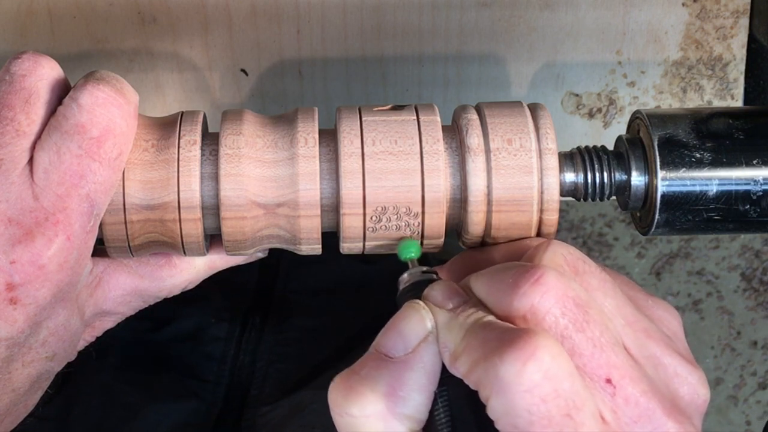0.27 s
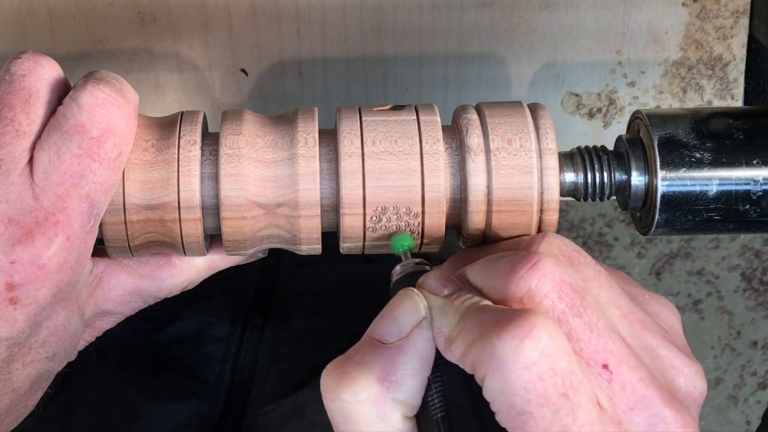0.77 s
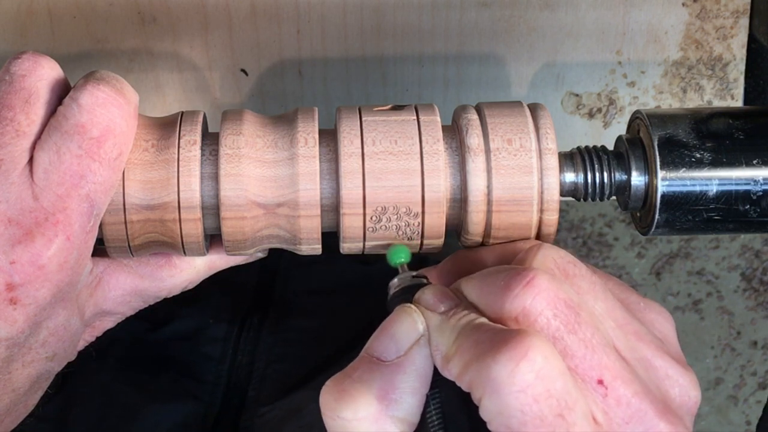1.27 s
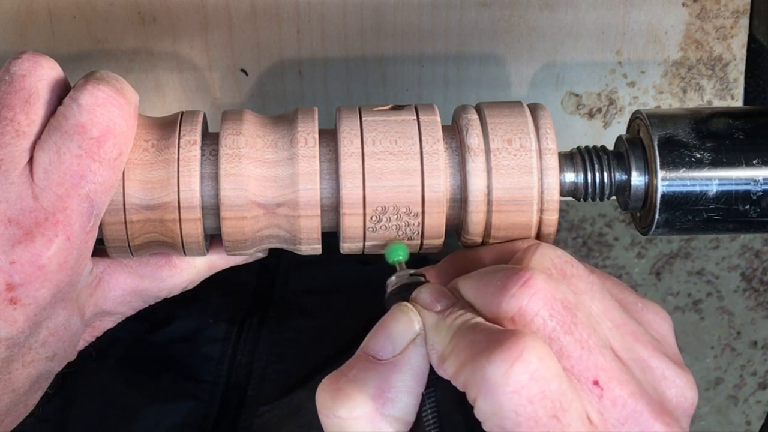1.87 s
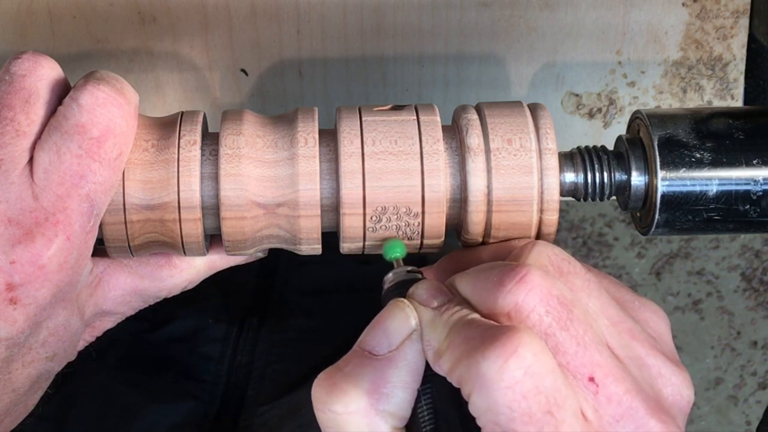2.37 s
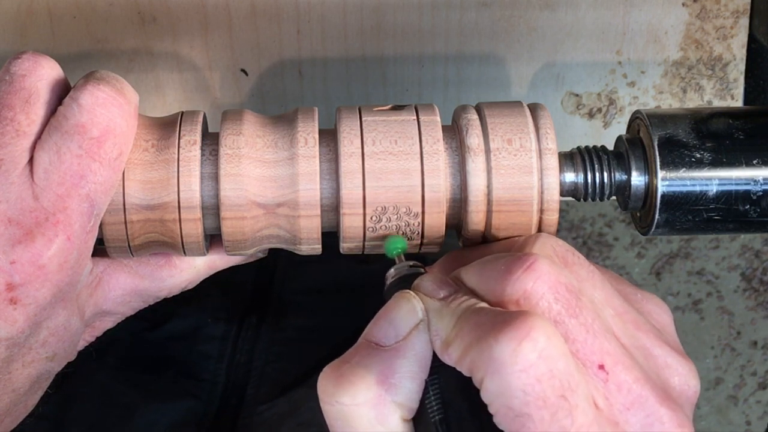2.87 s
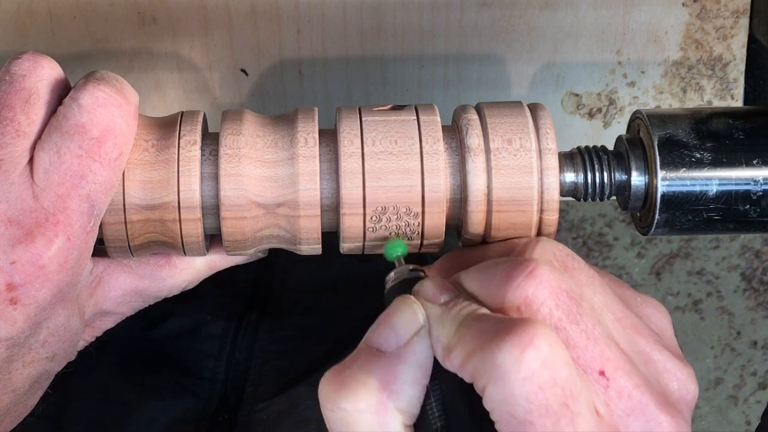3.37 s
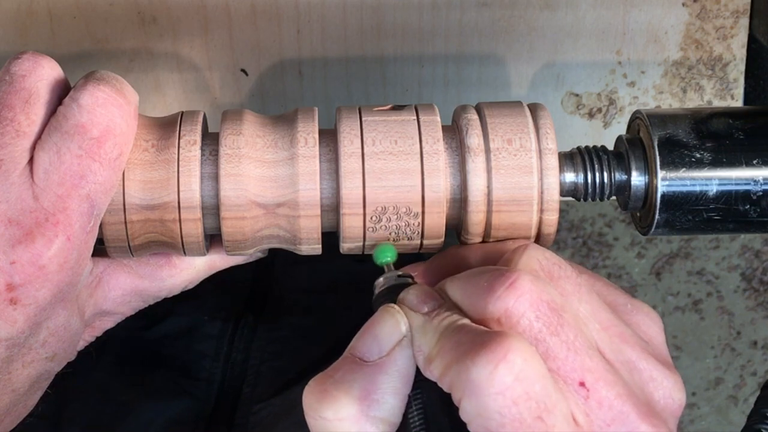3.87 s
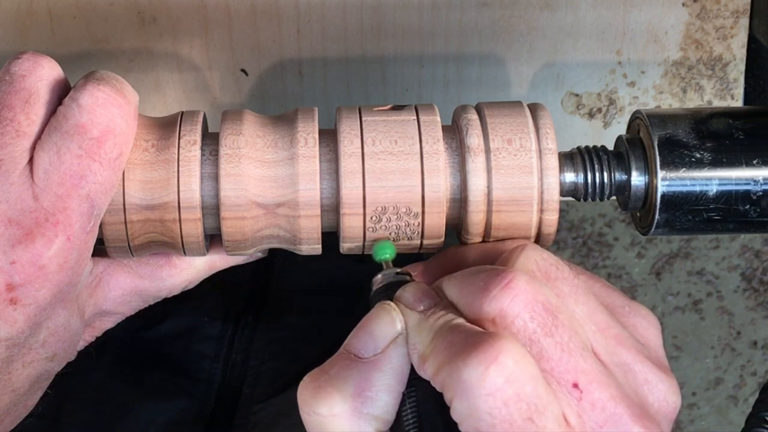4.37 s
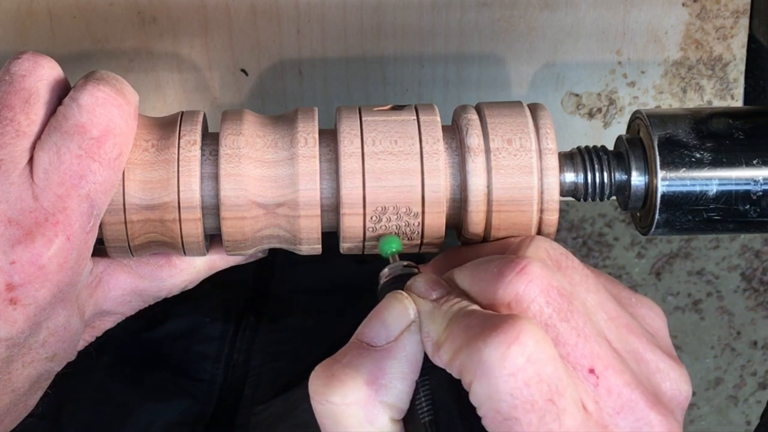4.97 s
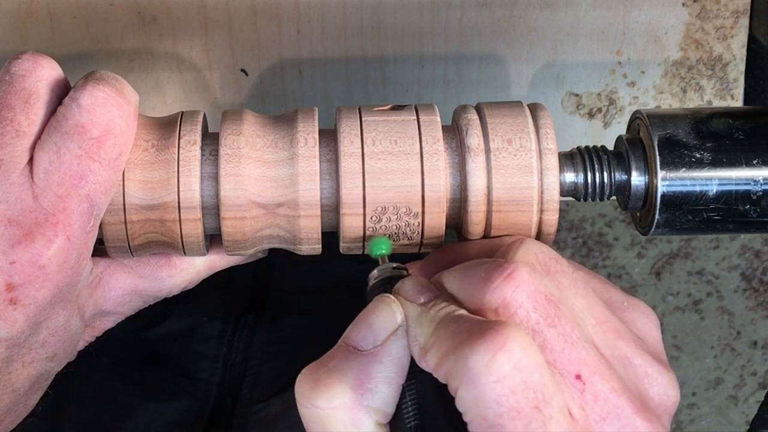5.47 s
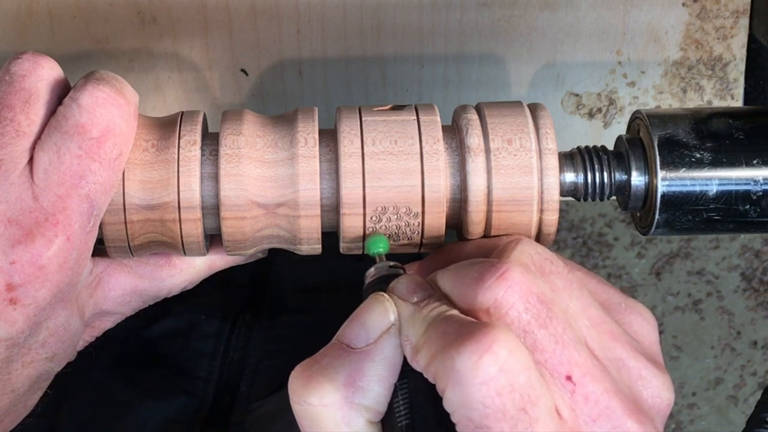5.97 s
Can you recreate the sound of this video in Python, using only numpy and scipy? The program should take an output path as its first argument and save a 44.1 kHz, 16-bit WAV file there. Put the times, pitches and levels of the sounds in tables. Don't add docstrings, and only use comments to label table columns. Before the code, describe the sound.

A small high-speed rotary carving tool whines close up, its pitch sagging and recovering as the burr is pressed repeatedly into wood.

```python
import sys
import numpy as np
from scipy import signal
from scipy.fft import rfft, irfft
from scipy.io import wavfile
from scipy.ndimage import uniform_filter1d, map_coordinates

SR = 44100
rng = np.random.default_rng(int(sys.argv[2]) if len(sys.argv) > 2 else 0)


def wav_out(sig):
    wavfile.write(sys.argv[1], SR, np.round(np.clip(np.atleast_2d(sig).T, -1, 1) * 32767).astype(np.int16))


def ratio_of_db(decibels):
    return 10 ** (np.asarray(decibels, float) / 20)


N = 274743
TIME = np.arange(N) / SR


def unit(x):
    return x / np.sqrt(np.mean(x ** 2) + 1e-20)


def curves(rows):
    start_s, *columns = np.transpose(rows)
    return [np.interp(TIME, start_s, column) for column in columns]


def wobble(rate):
    knots = rng.standard_normal(int(N * 60 / SR) + 4)
    return map_coordinates(knots, [TIME * rate], order=2)


def bump(centre_s, half_s):
    return np.exp(-((TIME - centre_s) / half_s) ** 2)


def slope(points):
    hz_points, level_db = np.transpose(points)
    return lambda hz: ratio_of_db(np.interp(np.log(hz), np.log(hz_points), level_db, left=-120, right=-120))


def noise(gain, patchy_db=0):
    z = signal.stft(rng.standard_normal(N), nperseg=512)[2]
    field = uniform_filter1d(rng.standard_normal(z.shape), size=5, axis=0)
    field = uniform_filter1d(field, size=10, axis=1)
    x = signal.istft(z * ratio_of_db(patchy_db * unit(field)), nperseg=512)[1][:N]
    hz = np.fft.rfftfreq(N, 1 / SR) + 1
    return unit(irfft(rfft(x, N) * gain(hz), N))


def tone(turns, order, db, fade_db, rate, blur):
    angle = 2 * np.pi * (order * turns + rng.random()) + blur * wobble(rate)
    return np.sqrt(2) * ratio_of_db(db + fade_db * wobble(rate)) * np.sin(angle)


def family(turns, load, orders, levels):
    out = 0
    for order, (idle_db, loaded_db) in zip(orders, levels):
        level_db = idle_db + (loaded_db - idle_db) * load
        out = out + tone(turns, order, level_db, fade_db=3, rate=14, blur=0.48)
    return out


# start_s [s], shaft_hz [turns/s], commutator_db (14th order) [dB], slot_db (7th order) [dB],
# bearing_db [dB], hiss_db [dB], fizz_db [dB]
MOTOR_COURSE = [(0.0, 642, -40.9, -31, -38.2, -30.5, -42.8), (0.12, 604, -30, -41, -41.4, -31.5, -43),
                (0.19, 588, -29.5, -37.1, -46, -34.5, -43), (0.314, 616.5, -33.8, -44, -31.5, -33.5, -45.0),
                (0.429, 634, -44.7, -34.9, -39, -31.3, -43), (0.668, 647.4, -59, -39.5, -30.5, -33, -44),
                (0.773, 649, -39.5, -41, -36, -31.0, -43.8), (0.873, 637.1, -42.2, -32.5, -42, -32.5, -42),
                (0.928, 617, -34, -31.5, -39, -33, -46), (0.988, 588.3, -31, -34, -43.7, -30.5, -41),
                (1.038, 580, -30, -39, -42, -33.1, -45.8), (1.197, 620.1, -34.5, -42, -34, -33, -44.5),
                (1.392, 642, -44.3, -37, -37.4, -32.5, -43.5), (1.556, 648.3, -44.5, -39, -35, -32, -45),
                (1.866, 651.5, -50, -36.5, -33.5, -32.5, -46.5),
                (2.305, 650, -39.5, -36.5, -31.7, -31.5, -46), (2.35, 642, -51, -36, -36, -32, -42),
                (2.405, 619, -28, -45.0, -35.2, -33.5, -41.7), (2.444, 602, -30, -44.0, -47, -32, -43.2),
                (2.484, 587.5, -30.8, -30, -33, -32, -42), (2.519, 581.4, -35.5, -44.6, -40, -32.5, -45.9),
                (2.679, 619.8, -33.4, -42, -39, -32.5, -47), (2.799, 634.9, -54, -34, -41, -32, -44.6),
                (2.878, 641.6, -53, -36.7, -40, -31.5, -48), (2.968, 644, -40, -38.9, -33, -31.5, -46),
                (3.073, 641, -50, -36, -44, -30.5, -44.9), (3.153, 617.9, -33, -35, -34, -32, -42),
                (3.228, 587, -30.7, -29, -46.1, -30.5, -46), (3.273, 577.5, -30, -34.5, -52, -34, -46.8),
                (3.422, 616.6, -33.5, -51, -33, -33, -46.2), (3.547, 634, -42, -37, -36, -33.5, -43.1),
                (3.602, 639.6, -41, -37.9, -37, -31, -47), (3.712, 646, -47.3, -40, -34, -32, -46),
                (3.737, 647.6, -45, -43.0, -38.5, -32, -43),
                (4.076, 652.3, -43, -37.5, -37.4, -31.7, -44.8), (4.29, 643.4, -39, -42.7, -45, -32, -45),
                (4.395, 612.4, -28.5, -34.8, -36, -31, -41.7), (4.47, 585.3, -33, -34.9, -37, -33, -47),
                (4.505, 580.7, -37.2, -47, -34.4, -33.2, -46), (4.555, 587.6, -31.5, -37, -36, -33, -47.2),
                (4.669, 618.3, -30, -48, -56, -32.5, -46.4), (4.739, 629.5, -49, -37, -47.7, -32, -46.0),
                (4.909, 644, -54, -34, -38, -31, -46), (4.974, 640.9, -47, -42.5, -47, -32, -44.8),
                (5.024, 634.8, -40.6, -38.3, -49, -32, -42), (5.108, 608, -28.9, -40, -42.2, -33, -43),
                (5.193, 577, -31.0, -32.3, -42.6, -33, -47), (5.248, 588.5, -29, -49, -44, -33.5, -47.4),
                (5.353, 616, -33.1, -46, -33, -32.3, -45), (5.403, 625.1, -41, -38, -33.9, -33.5, -45),
                (5.512, 639, -42, -36.5, -39.3, -30.5, -43), (5.552, 640, -55, -39, -43.1, -31.5, -44),
                (5.617, 646, -38, -41.1, -37, -32.5, -44.0), (5.712, 651.5, -41.9, -38, -44, -31, -43),
                (5.822, 648.4, -41.4, -38, -51, -30.5, -42), (5.862, 644, -46.8, -38, -47.3, -31, -43.3),
                (5.937, 624.5, -33, -35, -37, -34, -39), (5.966, 606.5, -27, -45, -38, -30.3, -40.6),
                (6.026, 578.6, -31.5, -28, -39, -33, -42), (6.061, 570, -32, -43, -38, -30, -44.6),
                (6.101, 575.3, -32, -41, -45, -33.5, -50), (6.176, 603.3, -30.8, -42, -46.1, -33.5, -44.7),
                (6.206, 608, -42, -47.0, -51, -32, -44.1), (6.226, 600.5, -49.3, -48.3, -50.2, -30, -43.7)]


def shaft():
    idle_hz, loaded_hz = 645, 590
    speed = uniform_filter1d(curves(MOTOR_COURSE)[0], size=SR // 40)
    lost_hz = idle_hz - speed
    braking = lost_hz / 0.19 - np.gradient(speed) * SR
    pressure = uniform_filter1d(np.clip(braking / 600, 0, 1), size=SR // 30)
    load = np.clip(lost_hz / (idle_hz - loaded_hz), 0, 1)
    return np.cumsum(speed) / SR, load, pressure


WEAK_ORDERS = [11, 12, 13, 16, 17, 18, 19, 20, 21, 22, 23, 24, 25, 26]
# idle_db [dB], loaded_db [dB]
WEAK_LEVELS = [(-53, -44), (-49, -51), (-52, -57), (-60, -53), (-59, -61), (-63, -62), (-66, -61),
               (-49.5, -58), (-57, -51), (-50, -57), (-57, -60), (-58, -61), (-62, -62), (-64, -60)]


def motor(turns, load):
    commutator_db, slot_db = curves(MOTOR_COURSE)[1:3]
    out = tone(turns, order=14, db=commutator_db, fade_db=2.5, rate=25, blur=0.49)
    out += tone(turns, order=7, db=slot_db, fade_db=1.0, rate=22, blur=0.45)
    return out + family(turns, load, WEAK_ORDERS, WEAK_LEVELS)


MIDDLE_ORDERS = np.array([3, 4, 5, 6, 8, 9, 10, 15, 16.075, 22.39])
FREE_LEVELS = [-44.5, -43, -48, -44, -51.5, -49.5, -43.5, -54, -49, -56]
# centre_s [s], order [multiples of shaft speed], level_db [dB], half_s [s]
SWELLS = [(0.06, 16.075, -48, 0.022), (0.07, 3, -40, 0.11), (0.165, 16.075, -39.9, 0.033),
          (0.168, 6, -34.5, 0.042), (0.17, 15, -43.9, 0.025), (0.21, 22.39, -41.6, 0.07),
          (0.693, 10, -35.5, 0.2), (0.783, 9, -40, 0.07), (0.886, 6, -36, 0.15), (0.918, 5, -38, 0.038),
          (0.933, 8, -37, 0.019), (0.975, 3, -32.8, 0.031), (0.978, 22.39, -44.9, 0.025),
          (1.083, 16.075, -49, 0.22), (1.106, 22.39, -41.7, 0.04), (1.551, 10, -38, 0.089),
          (1.99, 10, -46, 0.16), (2.285, 6, -33, 0.044), (2.3, 4, -43, 0.029), (2.405, 3, -44, 0.093),
          (2.425, 5, -43.5, 0.11), (2.434, 6, -42, 0.091), (2.444, 16.075, -45.0, 0.025),
          (2.509, 4, -42, 0.04), (2.563, 16.075, -34, 0.032), (2.628, 15, -55.0, 0.2),
          (2.992, 6, -35, 0.04), (3.013, 10, -38, 0.23), (3.043, 9, -46, 0.08), (3.103, 5, -40, 0.043),
          (3.208, 3, -37.5, 0.081), (3.213, 15, -39.7, 0.015), (3.233, 6, -34, 0.033),
          (4.183, 6, -38.8, 0.045), (4.253, 4, -33, 0.04), (4.319, 3, -40, 0.097), (4.402, 5, -47, 0.07),
          (4.414, 10, -35.9, 0.015), (4.45, 6, -40.5, 0.08), (4.455, 15, -42.0, 0.025),
          (4.48, 16.075, -35, 0.056), (4.499, 4, -39, 0.046), (4.906, 10, -38.4, 0.083),
          (4.998, 3, -32, 0.063), (5.02, 5, -39.5, 0.11), (5.083, 8, -35, 0.068), (5.083, 10, -32, 0.044),
          (5.087, 15, -38, 0.07), (5.105, 6, -40.9, 0.1), (5.119, 9, -33.5, 0.062), (5.205, 3, -37, 0.027),
          (5.414, 16.075, -43, 0.04), (5.421, 15, -53.1, 0.2), (5.916, 15, -48.0, 0.04),
          (5.943, 5, -46, 0.12), (5.951, 3, -43, 0.22), (5.99, 6, -34, 0.045), (6.039, 16.075, -42, 0.16)]


def overtones(turns, pressure):
    size = ratio_of_db(FREE_LEVELS)[:, None] * np.ones(N)
    for centre_s, order, level_db, half_s in SWELLS:
        nearest = np.abs(np.subtract(MIDDLE_ORDERS, order)).argmin()
        size[nearest] += ratio_of_db(level_db) * bump(centre_s, half_s)
    fade_db = 1.95 + 1.47 * pressure
    return sum(a * tone(turns, order, db=-0.5, fade_db=fade_db, rate=35, blur=0.39)
               for order, a in zip(MIDDLE_ORDERS, size))


# start_s [s], unbalance_db (1st order) [dB], bite_db (2nd order, beating the wood) [dB]
BURR_COURSE = [(0.0, -41.6, -47), (0.025, -35.1, -46.6), (0.06, -48, -47), (0.085, -42, -33.5),
               (0.115, -54, -35), (0.145, -39, -35.9), (0.185, -49, -35.8), (0.21, -42, -30),
               (0.249, -38, -52.5), (0.808, -37, -51), (0.943, -40, -27.5), (0.968, -42, -42.5),
               (0.988, -31, -35), (1.018, -42, -45.8), (1.033, -36, -38.1), (1.073, -52, -38.1),
               (1.098, -37.5, -51), (2.22, -36.6, -52), (2.38, -39.0, -41), (2.4, -48, -42),
               (2.42, -39, -35.0), (2.439, -53, -32.7), (2.459, -49, -33), (2.484, -35.5, -50.0),
               (2.499, -38, -38), (2.519, -52, -53), (2.554, -40, -35.5), (2.594, -38, -50.5),
               (3.073, -35.9, -49.5), (3.178, -42.5, -25), (3.223, -33, -40), (3.248, -47, -33),
               (3.268, -35, -42), (3.293, -49, -34), (3.342, -38.5, -53), (3.582, -35.7, -51),
               (4.27, -37.5, -50), (4.295, -40, -43.5), (4.325, -34.2, -48.1), (4.37, -45, -40.0),
               (4.395, -40, -53), (4.425, -46, -33.5), (4.47, -40, -42.5), (4.525, -51, -44),
               (4.58, -37.5, -47.6), (5.014, -36.7, -51.5), (5.039, -40.8, -38), (5.103, -45, -30),
               (5.128, -36.2, -48.0), (5.143, -33.5, -37), (5.158, -32, -34), (5.173, -54, -52),
               (5.188, -37.2, -41), (5.203, -35, -47.5), (5.223, -49, -45.7), (5.278, -37.5, -51),
               (5.777, -36.0, -52), (5.847, -39.5, -46.2), (5.912, -34.5, -41), (5.971, -43.5, -31),
               (5.996, -39, -48.5), (6.011, -30.5, -39), (6.031, -46, -38), (6.056, -28.5, -44),
               (6.096, -48, -39), (6.126, -34, -50), (6.146, -43.5, -53), (6.226, -36.5, -49)]
# centre_s [s], level_db [dB], lost_hz [turns/s], half_s [s]
SNAGS = [(0.052, -54, 90, .01), (1.032, -42, 90, .012), (1.071, -42, 80, 0.0097), (2.498, -45, 70, 0.0077),
         (2.534, -36.5, 119.2, 0.0131), (2.588, -45, 111, 0.0123), (3.248, -48, 80, .01),
         (5.168, -49, 90, .008), (6.064, -37, 90.1, 0.011), (6.097, -49, 100.4, 0.0083)]


def burr(turns, pressure):
    unbalance_db, bite_db = curves(BURR_COURSE)
    lost_turns, snag = 0, 0
    for centre_s, level_db, lost_hz, half_s in SNAGS:
        lost_turns = lost_turns + lost_hz * bump(centre_s, 1.5 * half_s)
        snag = snag + ratio_of_db(level_db) * bump(centre_s, half_s)
    lag = np.cumsum(lost_turns) / SR
    fade_db = -1.05 + 1.8 * pressure
    out = tone(turns, order=1, db=unbalance_db, fade_db=fade_db, rate=49, blur=0.05 + 0.4 * pressure)
    out += tone(turns - 0.3 * lag, order=2, db=bite_db, fade_db=2.3, rate=45, blur=0.6)
    return out + snag * tone(turns - lag, order=1, db=-6, fade_db=1.0, rate=30, blur=0.1)


# pitch_hz [Hz], level_db [dB per Hz]
CHIP_SPECTRUM = [(1500, -12), (4000, -5), (9000, 2), (10300, -13), (13500, -4), (15500, -6)]


def chips(turns, pressure):
    gate = unit(np.exp(2.9 * np.cos(2 * np.pi * turns)))
    return ratio_of_db(-36 + 2.5 * wobble(25)) * pressure * gate * noise(slope(CHIP_SPECTRUM))


BEARING_ORDERS = [5.08, 5.91, 6.32, 9.405, 9.58, 10.165, 10.4, 11.405, 12.41, 12.58, 13.74, 16.485, 16.9,
                  17.31, 18.12, 18.675, 19.2, 20.57, 21.16, 21.57, 22.81]
# idle_db [dB], loaded_db [dB]
BEARING_LEVELS = [(-55, -55), (-47, -49.5), (-60, -67), (-49, -63), (-61, -59), (-59, -45), (-64, -60),
                  (-46, -51.5), (-58.5, -62), (-55.5, -62), (-67, -67), (-70, -63), (-50, -55), (-54, -63),
                  (-55, -69), (-61, -69), (-59, -65), (-63, -62), (-55, -56), (-51, -55), (-52, -58)]


def bearings(turns, load):
    out = tone(turns, order=10.58, db=curves(MOTOR_COURSE)[3], fade_db=1.0, rate=23, blur=0.5)
    return out + family(turns, load, BEARING_ORDERS, BEARING_LEVELS)


# pitch_hz [Hz], level_db [dB per Hz]
HISS_SPECTRUM = [(450, -32), (900, -17.5), (1550, -10.5), (2100, 0), (2900, -10.5), (4000, -4.5),
                 (4800, -12), (5500, -7), (6600, -5), (7500, -9), (8600, -5), (9200, -8), (9800, -19),
                 (11000, -40)]
# pitch_hz [Hz], level_db [dB per Hz]
FIZZ_SPECTRUM = [(7000, -42), (9300, -3), (10400, -3.5), (11000, -0.5), (12000, -2), (14000, 2),
                 (16000, -4)]


def fan(turns):
    hiss_db, fizz_db = curves(MOTOR_COURSE)[4:]
    pulse = 1 + 0.19 * np.cos(2 * np.pi * turns)
    hiss = ratio_of_db(hiss_db + 0.53 + 0.37 * wobble(9)) * noise(slope(HISS_SPECTRUM), patchy_db=0.7)
    fizz = ratio_of_db(fizz_db + 5.0 + 0.37 * wobble(9)) * noise(slope(FIZZ_SPECTRUM), patchy_db=1.0)
    return pulse * hiss + fizz


# pitch_hz [Hz], level_db [dB per Hz]
RUMBLE_SPECTRUM = [(20, -33), (40, -13.5), (70, -5.5), (130, -17), (200, -22.5), (450, -18.5), (900, -42)]
# pitch_hz [Hz], width_hz [Hz], level_db [dB]
EXTRACTOR_HUM = [(54.7, 15, -62.5), (102, 7, -60)]


def workshop():
    out = ratio_of_db(-59.5) * noise(slope(RUMBLE_SPECTRUM))
    for pitch_hz, width_hz, level_db in EXTRACTOR_HUM:
        out += ratio_of_db(level_db) * noise(lambda hz: 1 / (1 + ((hz - pitch_hz) / width_hz * 2) ** 2))
    return out + ratio_of_db(-68.5 + wobble(6)) * np.sin(2 * np.pi * 173 * TIME)


def scene():
    turns, load, pressure = shaft()
    tool = motor(turns, load) + overtones(turns, pressure) + burr(turns, pressure)
    tool += chips(turns, pressure) + bearings(turns, load) + fan(turns)
    mono = tool + workshop()
    return np.array([mono, mono])


def band_limit(x):
    return signal.sosfilt(signal.butter(12, 16050, fs=SR, output="sos"), x)


# start_s [s], low_hz [Hz], high_hz [Hz]
NOISE_BANDS = [(0.322, 12403, 13781), (0.322, 14470, 15848), (0.415, 14470, 15848), (0.903, 10249, 12403),
               (1.553, 6890, 8354), (1.553, 14470, 15848), (1.601, 11025, 12403), (1.715, 8871, 10335),
               (1.739, 5081, 6287), (2.435, 6201, 7579), (2.482, 8871, 10335), (2.482, 12403, 13867),
               (3.109, 9560, 11025), (3.155, 4651, 5770), (3.248, 13781, 15245), (3.55, 14470, 15848),
               (3.736, 4134, 5770), (3.736, 11025, 12403), (4.13, 7493, 9043), (4.201, 10938, 12489),
               (4.246, 9646, 11111), (4.246, 12316, 13781), (4.386, 5684, 6976), (4.386, 13092, 15934),
               (4.78, 5081, 6373), (4.78, 13695, 15073), (5.454, 11714, 13092), (5.849, 10938, 12403),
               (5.895, 10335, 11800), (5.965, 4134, 5254), (5.965, 11627, 13178), (5.965, 13781, 15245),
               (6.197, 7493, 9043), (6.198, 13006, 14556)]


def record(dry):
    top_hz = 15730
    out = irfft(rfft(dry) * (np.fft.rfftfreq(N, 1 / SR) < top_hz), N)
    hop, first = 1024, 899
    window = signal.windows.kaiser_bessel_derived(2 * hop, 4 * np.pi)
    phase_steps = np.arange(2 * hop) + 0.5 + hop / 2
    for start_s, low_hz, high_hz in NOISE_BANDS:
        start = first + hop * (round((start_s * SR - first) / hop) - 1)
        low_bin, high_bin = [round(hz * 2 * hop / SR) for hz in (low_hz, min(high_hz, top_hz))]
        bins = np.arange(low_bin, high_bin)
        cosines = np.cos(np.pi / hop * np.outer(bins + 0.5, phase_steps))
        basis = window * cosines * np.sqrt(2 / hop)
        part = out[:, start:start + 2 * hop]
        found = part @ basis.T
        fresh = found.std() * rng.standard_normal(found.shape)
        part += (fresh - found) @ basis
    return band_limit(out)


dry = scene()
out = record(dry)
wav_out(out)
```